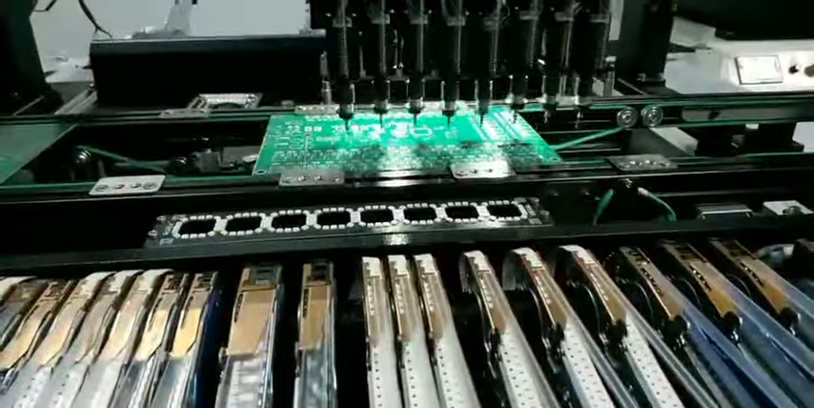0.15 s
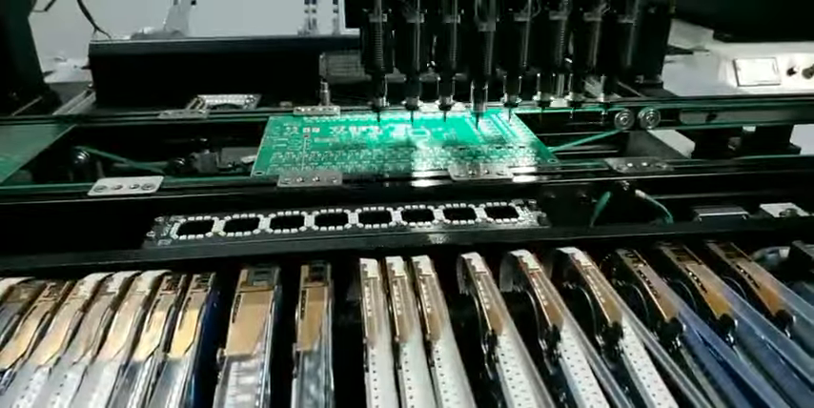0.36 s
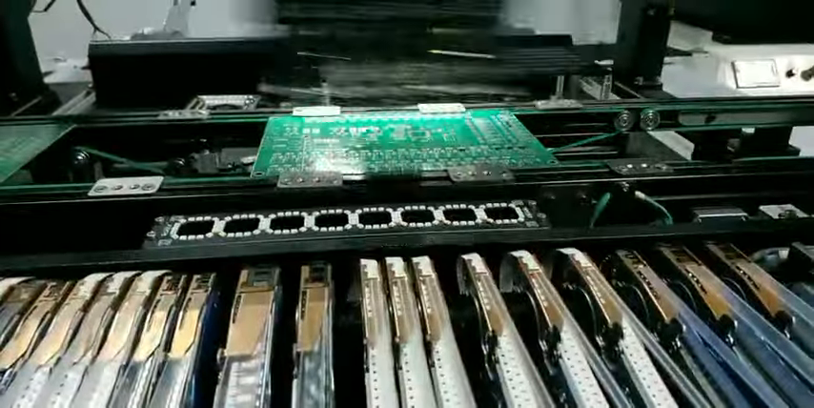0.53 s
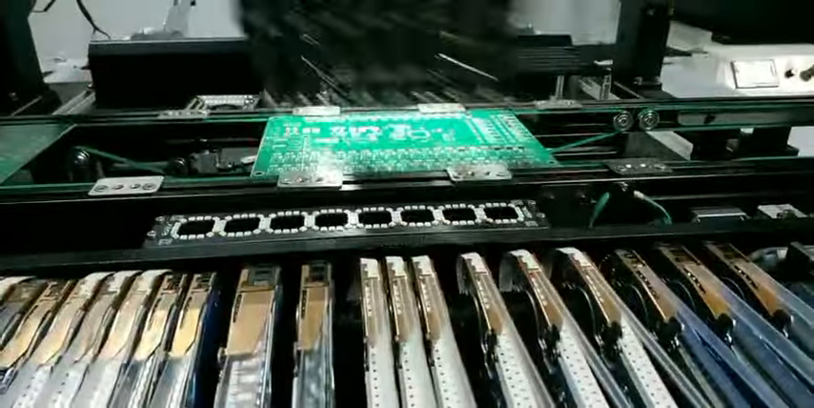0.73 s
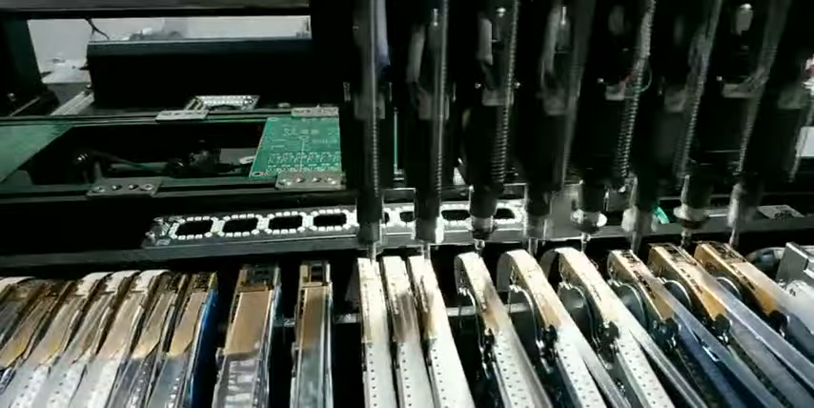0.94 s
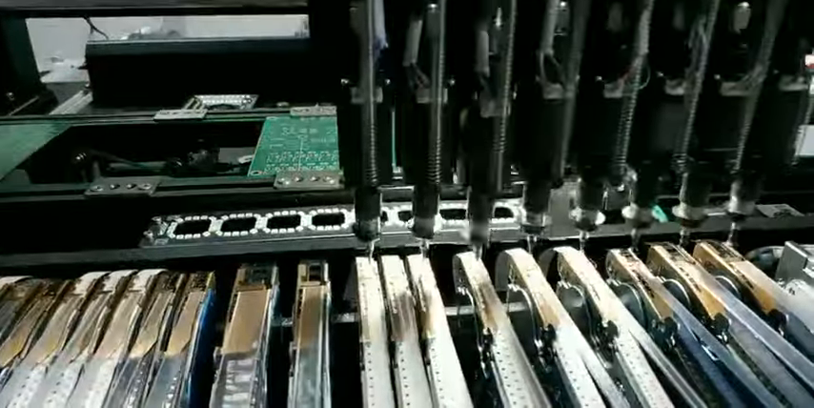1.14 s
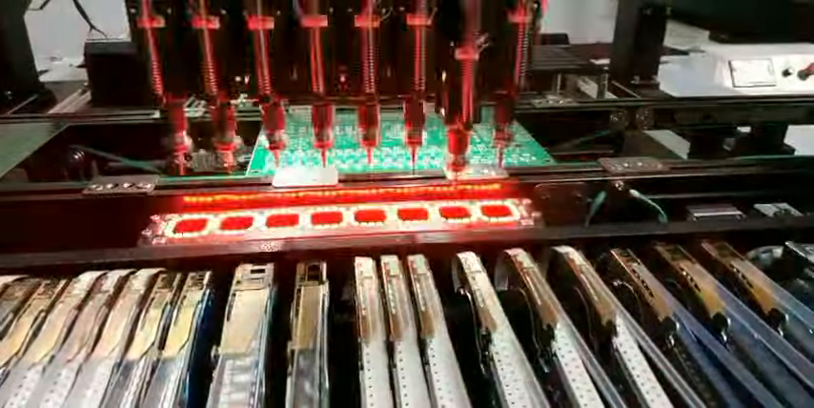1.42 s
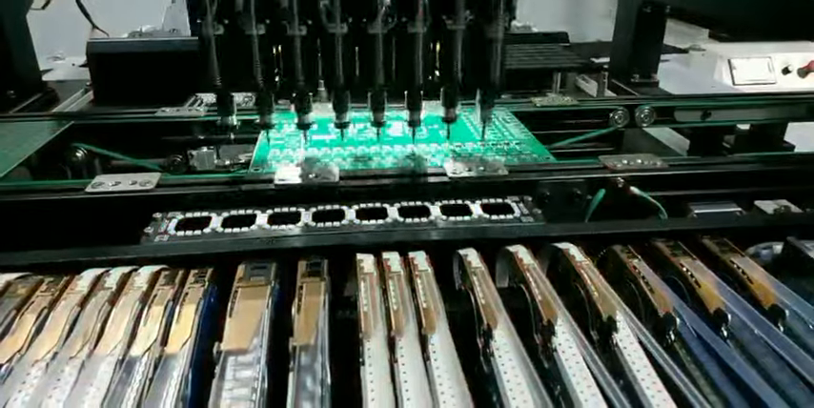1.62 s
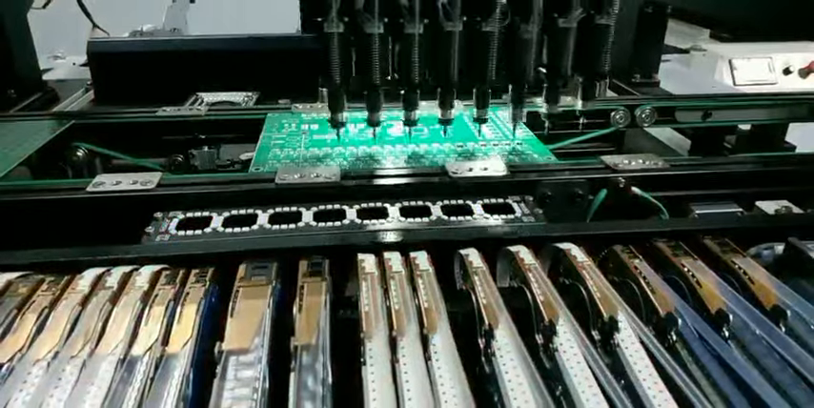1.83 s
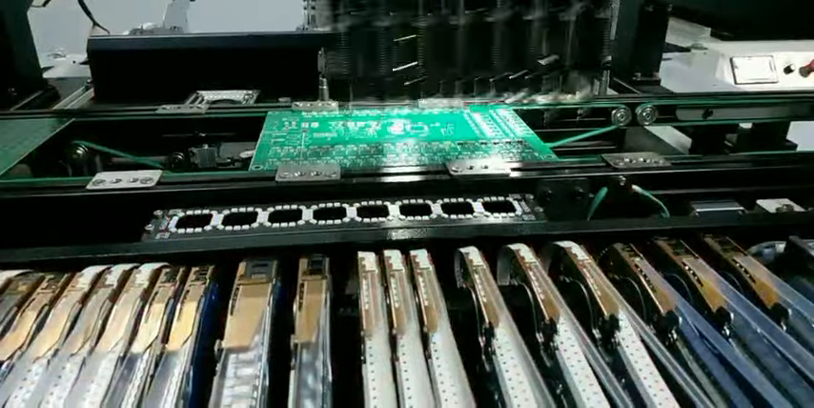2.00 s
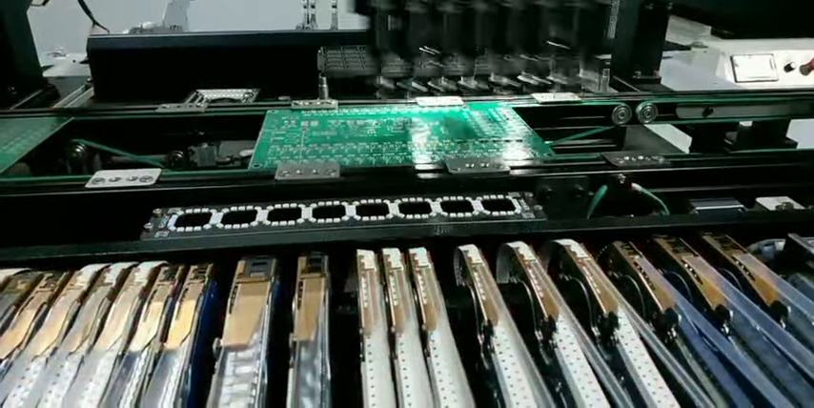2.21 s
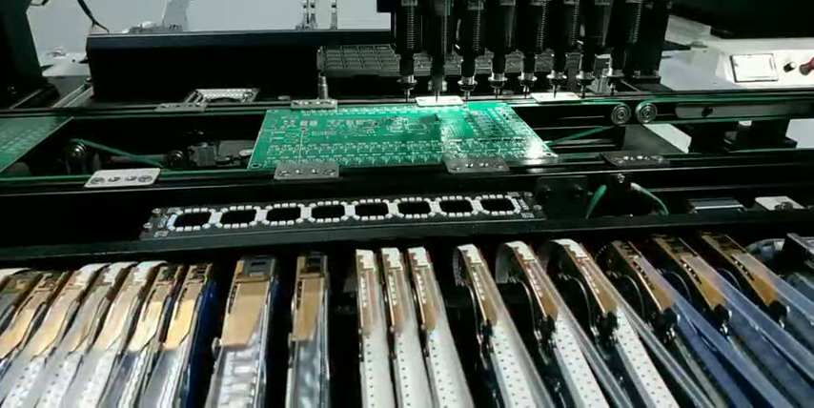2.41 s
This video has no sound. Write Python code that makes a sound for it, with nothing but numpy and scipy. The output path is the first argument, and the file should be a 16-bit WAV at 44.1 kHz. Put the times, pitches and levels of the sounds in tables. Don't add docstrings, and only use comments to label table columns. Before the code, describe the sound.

Close up in a factory hall, turbulent air hisses from a board assembly machine, drops away before one second, returns abruptly and continues until easing at the end; short mechanical whooshes and low rumble lie underneath.

```python
import sys
import numpy as np
from scipy import signal
from scipy.fft import rfft, irfft, next_fast_len
from scipy.io import wavfile
from scipy.ndimage import uniform_filter1d

SR = 44100
rng = np.random.default_rng(int(sys.argv[2]) if len(sys.argv) > 2 else 0)


def generate_wav(sig):
    pcm = np.round(np.clip(np.atleast_2d(sig).T, -1, 1) * 32767).astype(np.int16)
    wavfile.write(sys.argv[1], SR, pcm)


def volts(x):
    e = np.asarray(x, float) / 20
    return 10 ** e


N = 112455


def rms_one(x):
    return x / np.sqrt(np.mean(x ** 2) + 1e-20)


def drift(rate_hz):
    r = np.exp(-80 * np.pi * rate_hz / SR)
    slow = signal.lfilter([1], [1, -2 * r, r * r], rng.standard_normal(N // 40 + 2002))
    slow = slow[2000:]
    return np.interp(np.arange(N) / 40, np.arange(len(slow)), rms_one(slow - slow.mean()))


def noise_bands(spectrum):
    size = next_fast_len(N)
    hz = np.maximum(np.arange(size // 2 + 1) * SR / size, 1)
    f, db = np.transpose(spectrum)
    colour = volts(np.interp(np.log(hz), np.log(f), db, -120))
    noise = rfft(rng.standard_normal(size)) * colour
    noise = noise / np.std(irfft(noise, size))
    for centre in 20 * 2 ** (np.arange(30) / 3):
        if f[0] / 1.3 < centre < f[-1] * 1.3:
            triangle = np.clip(1 - np.abs(3 * np.log2(hz / centre)), 0, 1)
            yield centre, irfft(noise * triangle, size)[:N]


def narrow(lines, waver_db):
    out = 0
    for hz, width, db in lines:
        r = np.exp(-np.pi * max(width, 2) / SR)
        poles = [1, -2 * r * np.cos(2 * np.pi * hz / SR), r * r]
        tone = rng.standard_normal(N + SR // 2)
        for _ in range(2):
            tone = signal.lfilter([1, 0, -1], poles, tone)
        out = out + volts(db + waver_db * drift(2)) * rms_one(tone[-N:])
    return out


def hall(t):
    # f/Hz, level/dB per Hz
    rumble_spectrum = [(25, -1), (60, -14), (120, 1), (320, -2), (520, -9.5), (1000, -16), (2500, -36),
                       (9000, -34)]
    # f/Hz, width/Hz, level/dB rms
    motor_tones = [(74.3, 26, -54), (163, 33, -52.5), (301.6, 22, -53)]
    # f/Hz, level/dB per Hz
    neighbour_spectrum = [(350, -18), (600, 2), (1100, -0.5), (1500, -1.5), (2100, -16)]
    # t/s, level/dB
    neighbour_level = [(0, -44), (.2, -46), (.42, -56), (.6, -41.5), (.7, -63), (.95, -43), (1.2, -44.5),
                       (1.9, -45), (2.2, -47), (2.4, -55), (2.55, -55.5)]
    shared = drift(1.7)
    rumble = sum(band * volts(.6 * shared + 1.2 * drift(6)) for hz, band in noise_bands(rumble_spectrum))
    others = sum(band * volts(1.8 * drift(9.1)) for hz, band in noise_bands(neighbour_spectrum))
    others = others * volts(np.interp(t, *np.transpose(neighbour_level)))
    whine_db = -54 - 2 * t + 1.5 * drift(8)
    whine_hz = 1114 + 3 * drift(11)
    whine = volts(whine_db) * np.sqrt(2) * np.sin(2 * np.pi * np.cumsum(whine_hz) / SR)
    return volts(-42.5) * rumble + whine + narrow(motor_tones, waver_db=1.5) + others


def gantry(t):
    # t/s, length/s, level/dB, treble against bass/dB
    moves = [(0.1, 0.054, -40.5, 5), (0.28, 0.039, -36.5, -6), (0.415, 0.023, -63, -14),
             (0.492, .13, -32.5, 2), (0.717, 0.2, -29, 7.5), (0.996, 0.054, -41, 1),
             (1.222, 0.14, -33.5, 7.5), (1.465, 0.2, -31, -6.5), (1.723, 0.064, -37, 13.5),
             (1.837, 0.029, -41.5, -4), (2.066, 0.088, -33, -1), (2.258, 0.077, -36, -13),
             (2.462, 0.046, -40.5, -16)]
    # f/Hz, level/dB per Hz
    rail_spectrum = [(200, -6), (400, 1), (1250, -6), (1600, -5), (7000, -7), (10300, -10.5),
                     (11800, -18.5), (14100, -19.5)]
    # f/Hz, width/Hz, level against the rush/dB
    frame_rings = [(293, 51, -16.5), (491, 47, -22.5), (934, 59, -18), (1596, 45, -20), (1935, 130, -17.5),
                   (2890, 120, -25)]
    bass_ring_s, treble_ring_s = 0.056, .006
    bands = list(noise_bands(rail_spectrum)) + [(400, narrow(frame_rings, waver_db=6.0))]
    out = np.zeros(N)
    for start, length, db, treble_db in moves:
        on = (t > start) & (t < start + length + .3)
        speed = np.sin(np.pi * np.clip((t[on] - start) / length, 0, 1)).clip(0)
        for hz, band in bands:
            high = np.clip(np.log2(hz / 400) / 4, 0, 1)
            r = np.exp(-1 / (SR * bass_ring_s ** (1 - high) * treble_ring_s ** high))
            drive = speed ** (0.55 + high * 1.1)
            ringing = signal.lfilter([1 - r], [1, -r], drive)
            out[on] += volts(db + treble_db * high) * band[on] * np.maximum(drive, ringing)
    return out * volts(.8 * drift(70) + .3 * drift(15))


def nozzles(t):
    # t/s, level/dB, low roar against whistle/dB
    air_first = [
        (0, -21, -0.5),
        (.135, -22.5, -1),
        (.16, -25, -1),
        (.42, -28, -6),
        (.46, -34, -1),
        (.635, -35, 2),
        (.68, -42, -1),
        (.70, -49, -2),
        (.73, -45.5, -4),
    ]
    # t/s, level/dB, low roar against whistle/dB
    air_second = [
        (.905, -36, 6),
        (.913, -37, 7),
        (.921, -22.5, -3.5),
        (1.03, -22, -4.5),
        (1.04, -20, -3.5),
        (1.3, -21, 0),
        (2.0, -22.5, 0),
        (2.48, -24.5, -1.5),
        (2.55, -28.5, 2.5),
    ]
    # f/Hz, level/dB per Hz
    hiss_spectrum = [(1100, -26), (1750, -15.5), (2300, -7.5), (6400, -6.5), (8300, -1), (10700, -3),
                     (11400, -8), (14100, -9.5)]
    # f/Hz, width/Hz, level against the hiss/dB
    edge_whistles = [(2320, 30, -48), (2724, 30, -31.5), (3215, 44, -26), (5550, 230, -24.5),
                     (7940, 140, -63), (8360, 220, -31.5), (9040, 450, -15), (10110, 470, -27.5)]
    # t/s, puff over the flow/dB
    valves = [
        (0.919, -1),
        (1.037, 2),
        (1.146, 2),
        (1.24, 0.5),
        (1.421, 1.5),
    ]
    # t/s, length/s, f/Hz, level against the hiss/dB
    leak_whistles = [
        (1.6, 0.48, 5550, -14.5),
        (2.003, 0.79, 6280, -13),
    ]
    puff_s, roar_below_hz = 0.041, 5600

    shut = [(air_first[-1][0] + .02, -70, 0), (air_second[0][0] - .02, -70, 0)]
    s, db, roar_db = np.transpose(list(air_first) + shut + list(air_second))
    level = np.interp(t, s, db) + 3.5
    for opens, puff_db in valves:
        level = level + puff_db * (t > opens) * np.exp(-np.abs(t - opens) / puff_s)
    level = level + .5 * drift(2) + 0.36 * drift(70) + 0.36 * drift(450)

    roar = np.interp(t, s, roar_db)
    hiss = 0
    for hz, band in noise_bands(hiss_spectrum):
        tilt = roar / (1 + (hz / roar_below_hz) ** 6)
        hiss = hiss + band * volts(tilt + 1.26 * drift(1.43) + .5 * drift(49))
    leaks = 0
    for start, length, hz, db in leak_whistles:
        swell = np.sin(np.pi * np.clip((t - start) / length, 0, 1))
        leaks = leaks + narrow([(hz, 250, db)], waver_db=5.5) * swell
    return volts(level) * (hiss + leaks + narrow(edge_whistles, waver_db=1.5))


def scene():
    t = np.arange(N) / SR
    return np.tile(hall(t) + gantry(t) + nozzles(t), (2, 1))


def drop_masked(x):
    mask_db, weak_db, hearing_db = -7, -6, -74
    mask_top_hz, hearing_from_hz, cut_hz = 5600, 10800, 13960
    args = dict(fs=SR, window="cosine", nperseg=2048, noverlap=1024)
    hz, _, z = signal.stft(x, **args)
    power, hz = np.abs(z) ** 2, hz[:, None]
    band = power[:1024].reshape(256, 4, -1).mean(axis=1)
    band = np.repeat(band, 4, axis=0)[np.minimum(np.arange(1025), 1023)]
    band = uniform_filter1d(band, size=2, axis=1)
    mask = uniform_filter1d(uniform_filter1d(power, size=61, axis=0), size=2, axis=1)
    lost = band < mask * volts(2 * (mask_db + 2.3 * (hz > 2400)))
    lost = lost & (hz > 700) & (hz < mask_top_hz)
    lost = lost | np.roll(lost, 1, axis=1)
    weak = (power < mask * volts(2 * weak_db)) & (hz > 1500)
    z = z * np.where(hz > 2500, power / (mask + 1e-30), 1) ** .1
    audible = np.clip(band / volts(2 * hearing_db), 0, 1) ** 2
    faint = audible * (hz > hearing_from_hz) + (hz <= hearing_from_hz)
    z = z * np.where(lost | weak, .04, 1) * faint * (hz < cut_hz)
    return signal.istft(z, **args)[1][:N]


def side_splits():
    # t/s, low f/Hz, high f/Hz, level/dB rms
    splits = [(.832, 10400, 12500, -41), (1.088, 8950, 10300, -27), (1.133, 10400, 11700, -32),
              (1.133, 4200, 5140, -36), (1.343, 10300, 12400, -30), (1.344, 7550, 9050, -26.5),
              (2.039, 4150, 5200, -39), (2.434, 7650, 8900, -30)]
    t, side = np.arange(N) / SR, 0
    for s, low_hz, high_hz, db in splits:
        sos = signal.ellip(6, 1, 70, [low_hz, high_hz], "band", fs=SR, output="sos")
        band = signal.sosfilt(sos, rng.standard_normal(N))
        swell = np.cos(np.pi * np.clip((t - s) / .046, -.5, .5))
        side = side + volts(db) * rms_one(band) * swell
    return side * [[1], [-1]]


def top_cut(x):
    return signal.sosfilt(signal.butter(12, 15160, fs=SR, output="sos"), x)


def record(dry):
    mix = drop_masked(dry[0]) + side_splits()
    return top_cut(mix)


dry = scene()
out = record(dry)
generate_wav(out)
```